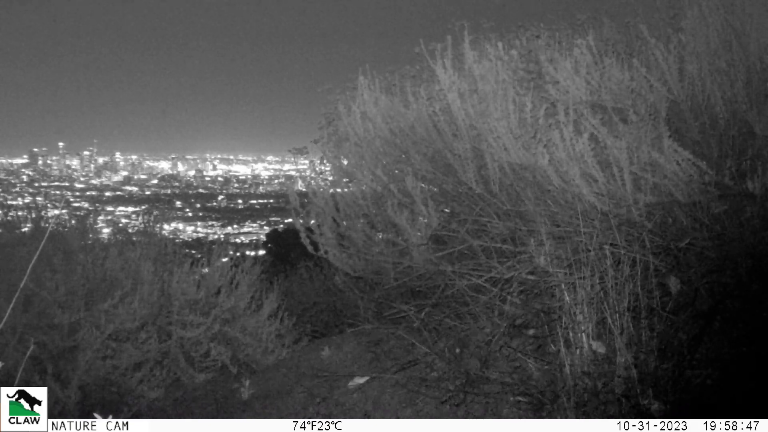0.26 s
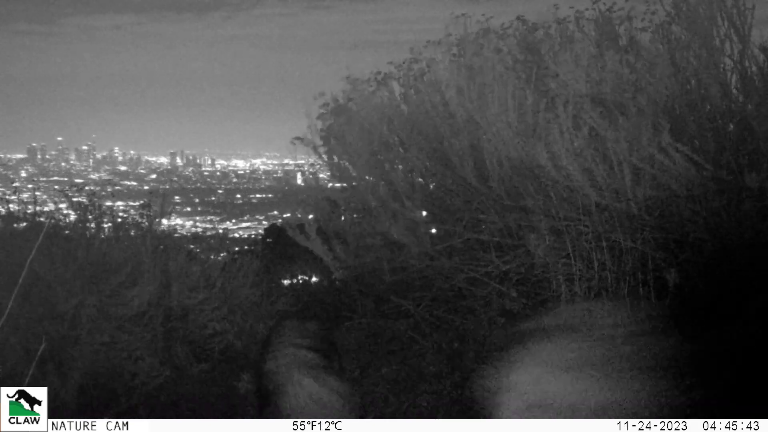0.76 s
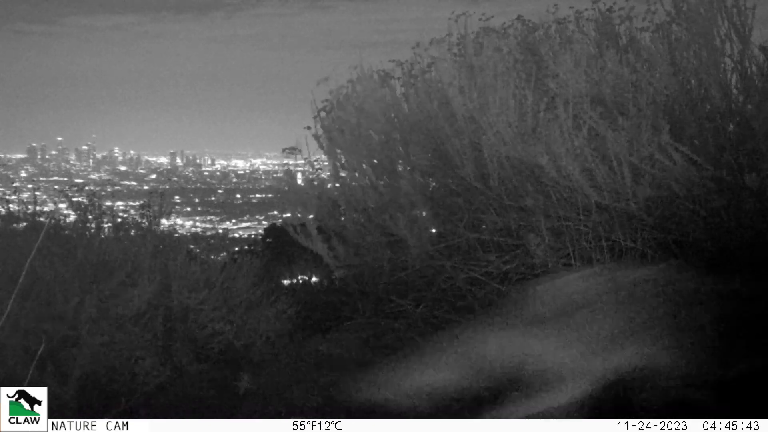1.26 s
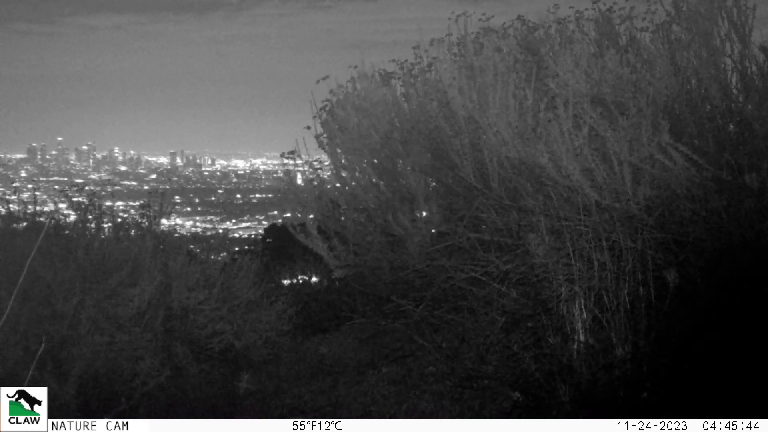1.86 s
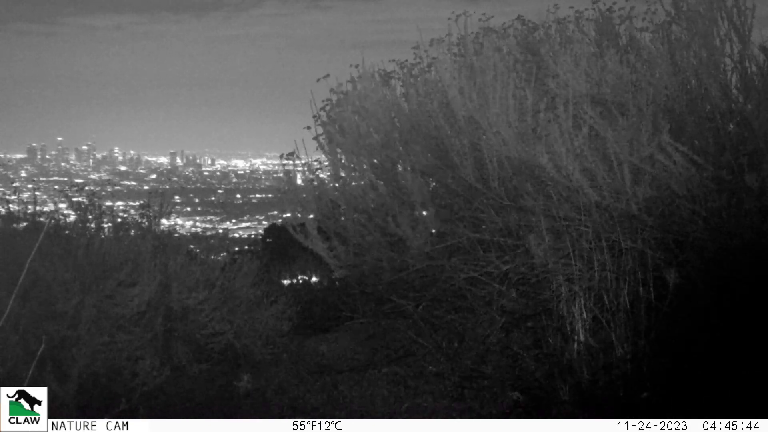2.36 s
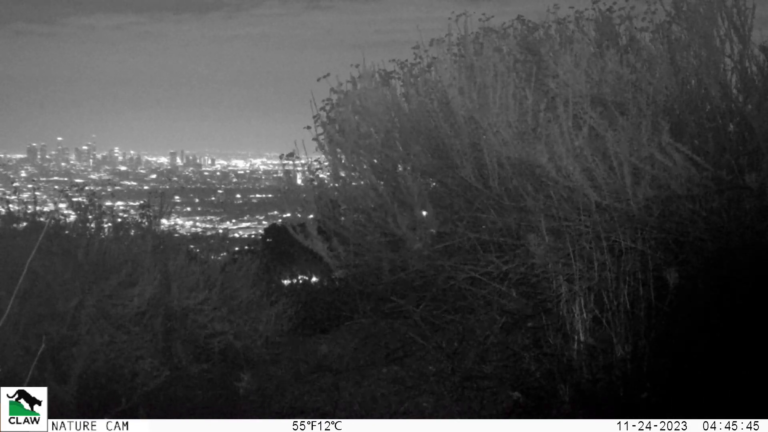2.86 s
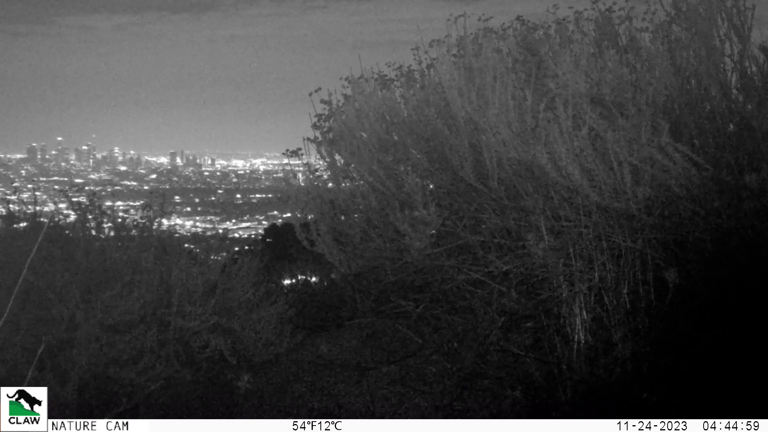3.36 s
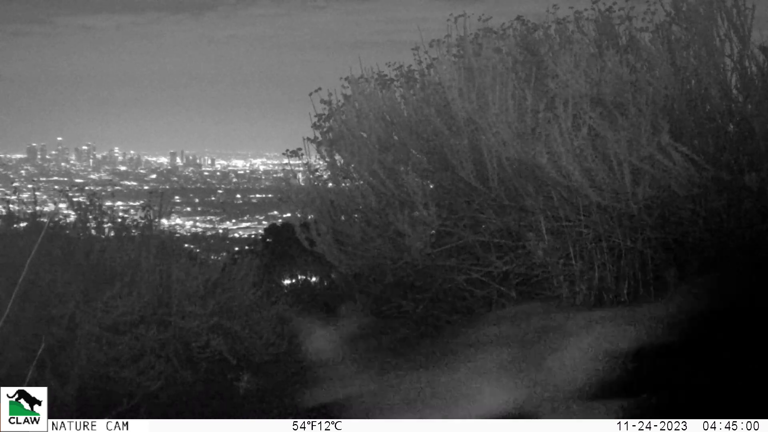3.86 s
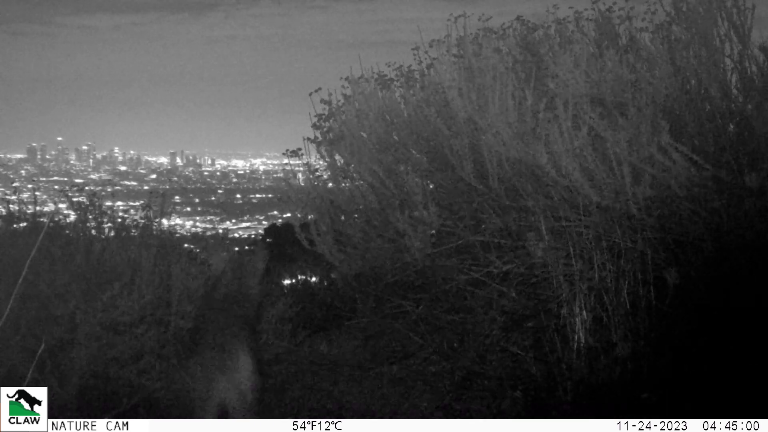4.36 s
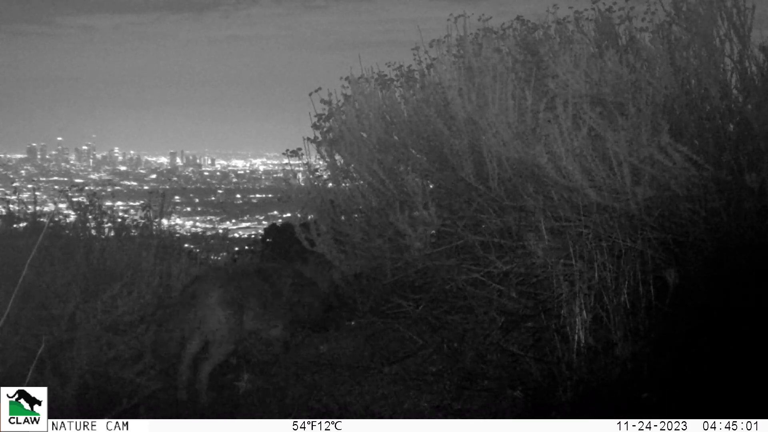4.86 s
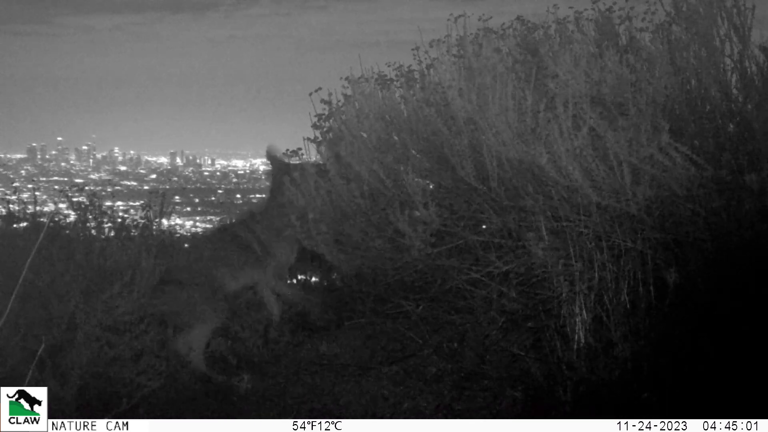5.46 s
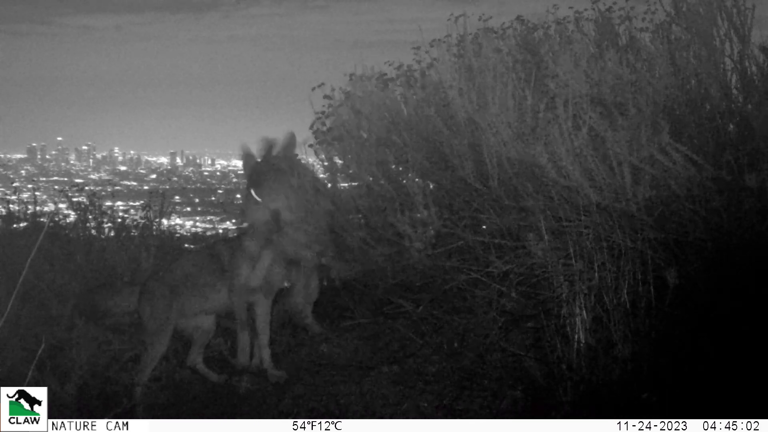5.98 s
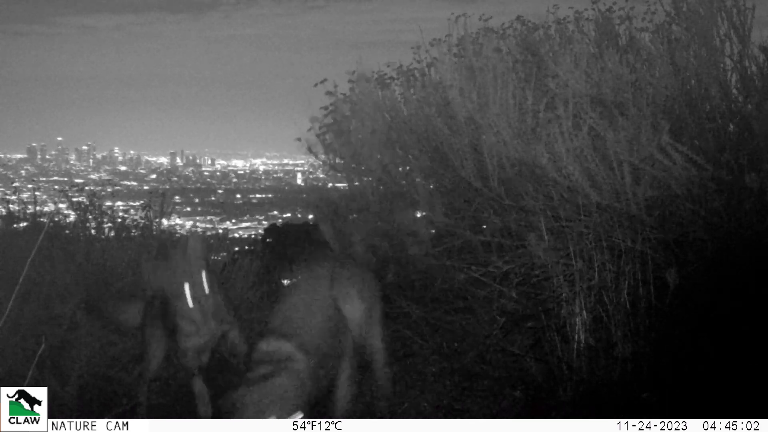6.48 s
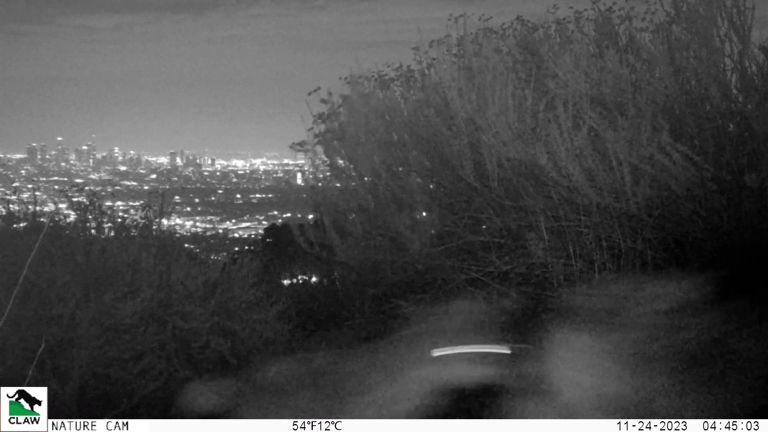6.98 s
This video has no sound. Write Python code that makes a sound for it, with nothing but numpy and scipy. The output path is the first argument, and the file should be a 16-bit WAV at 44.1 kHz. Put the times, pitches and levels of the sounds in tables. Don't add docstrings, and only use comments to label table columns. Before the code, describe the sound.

Dry stems crackle and snap as coyote-like animals scuffle past, followed by a quiet night lull with cricket chirps, buzzing katydid strokes and lighter rustling.

```python
import sys
import numpy as np
from scipy import signal
from scipy.io import wavfile
from scipy.ndimage import uniform_filter1d

SR = 44100
rng = np.random.default_rng(int(sys.argv[2]) if len(sys.argv) > 2 else 0)


def unload_audio(sound):
    columns = np.transpose(np.atleast_2d(sound))
    steps = np.round(np.clip(columns, -1, 1) * 32767)
    wavfile.write(sys.argv[1], SR, steps.astype(np.int16))


def field_ratio(decibels):
    return 10 ** (np.asarray(decibels, dtype=float) / 20)


N = 318843


def evened(x):
    return x / np.sqrt(np.mean(x ** 2) + 1e-20)


def read(points, hz):
    f, value = np.transpose(points)
    return np.interp(np.log(hz + 1), np.log(f + 1), value)


def column(rows, k):
    return np.interp(np.arange(N) / SR, *np.transpose(rows)[[0, k]])


def add(mix, s, sound):
    part = mix[round(s * SR):][:len(sound)]
    part += sound[:len(part)]


def colour(x, points):
    level_db = np.maximum(read(points, np.fft.rfftfreq(4096, 1 / SR)), -100)
    half = level_db * np.log(10) / 20
    full = np.r_[half, half[-2:0:-1]]
    taps = np.fft.ifft(np.exp(full - 1j * signal.hilbert(full).imag)).real[:2048]
    return signal.oaconvolve(x, taps)[:len(x)]


def resonate(x, hz, width):
    turn = np.exp(2j * np.pi * np.cumsum(hz * np.ones(len(x))) / SR)
    r = np.exp(-np.pi * width / SR)
    return 2 * (turn * signal.lfilter([1 - r], [1, -r], x / turn + 1e-18)).real


def band(x, lo_hz, hi_hz):
    return signal.sosfilt(signal.butter(3, [lo_hz, hi_hz], "bandpass", fs=SR, output="sos"), x)


def rustle():
    # pitch in Hz, level in dB per Hz.
    stem_colour = [(350, -64), (600, -13.5), (929, -20.5), (1360, -18), (1840, -15.5), (2290, -12.5),
                   (3450, -15), (4530, -8), (4980, -10.5), (5410, -2), (6030, 2.5), (8040, -11.5),
                   (8970, -12.5), (15700, -20.5)]
    # time in seconds, pitch in Hz.
    twig_hz = [(1.9, 8970), (2., 10100), (2.45, 10100), (2.6, 8860)]
    db = stir_db()
    thick, thin = cracks(), cracks()
    body = band(colour(thick, stem_colour), 260, 8170)
    top = band(colour(.5 * thick + thin, stem_colour), 9100, 17600)
    top = .8 * top + 1.2 * resonate(top, column(twig_hz, 1), 1100)
    top_db = -55 - 7 + 0.85 * (db + 54.5)
    return field_ratio(db) * evened(body) + field_ratio(top_db) * evened(top)


def stir_db():
    # time in seconds, level in dB.
    settling = [(.385, -80), (.4, -60.5), (.7, -58.5), (.97, -60), (1.27, -63), (1.94, -62), (1.975, -69),
                (2.4, -64.5), (2.59, -62.5), (2.64, -73), (2.8, -65), (3.1, -67), (3.2, -64.5),
                (3.45, -64.5), (3.55, -74), (5.43, -73), (5.47, -62.5), (7.23, -66)]
    # peak time in seconds, peak level in dB, rise in seconds, fall in seconds.
    sweeps = [(.484, -47.5, 0.033, 0.13), (.598, -49.5, .1, 0.084), (.748, -53, .15, 0.073),
              (.87, -45.5, 0.023, 0.063), (1.012, -49.5, 0.032, 0.33), (1.15, -58, .1, 0.14),
              (1.3, -52.5, 0.034, 0.043), (1.59, -47.5, 0.017, 0.038), (1.71, -52.5, .07, 0.061),
              (1.995, -56, 0.017, .4), (2.09, -58, 0.13, .07), (2.19, -52.5, 0.06, 0.17),
              (2.24, -56, .1, 0.036), (2.35, -51.5, .09, .1), (2.68, -59.5, .015, .2),
              (3.728, -52, 0.041, .045), (3.954, -54, 0.029, 0.11), (4.02, -57, .15, 0.017),
              (4.158, -69, .12, .04), (5.68, -61, 0.42, .05), (5.714, -49.5, 0.044, .14),
              (5.816, -58, .03, 0.064), (5.95, -53, 0.072, 0.054), (5.99, -56.5, .05, .9),
              (6.522, -56.5, 0.11, 0.32), (6.898, -58.5, 0.32, .25), (7.108, -50.5, 0.019, 0.022),
              (7.218, -60, 0.14, .03)]
    span_db = 12
    t = np.arange(N) / SR
    power = field_ratio(2 * column(settling, 1))
    for s, db, rise, fall in sweeps:
        away = np.maximum((s - t) / rise, (t - s) / fall)
        power = power + field_ratio(2 * (db - span_db * away))
    return 10 * np.log10(power)


def cracks():
    size = field_ratio(3.35 * np.minimum(rng.exponential(1, N), 5.5))
    happens = rng.random(N) < 3000 / SR
    clump = field_ratio(1.6 * evened(uniform_filter1d(rng.standard_normal(N), 350)))
    clicks = size * happens * rng.choice([-1., 1.], N) * clump
    linger = np.exp(-1 / (0.0032 * SR))
    hiss_power = signal.lfilter([1 - linger], [1, -linger], clicks ** 2)
    return evened(clicks + 1.46 * rng.standard_normal(N) * np.sqrt(hiss_power))


def snap(s, db, top_db, mid_db):
    t = np.arange(3000) / SR
    bottom_db = mid_db - 7
    t60 = 0.038 - .0009 * mid_db
    a, b = rng.standard_normal((len(t), 2)).T
    crack = (t == 0) * 3.5 + 1.44 * a * field_ratio(-60 * t / 0.0046)
    uneven = field_ratio(3.8 * evened(uniform_filter1d(b, 25)))
    splinters = a * field_ratio(-60 * t / np.clip(t60, .008, .12)) * uneven

    case = band(resonate(crack + 0.55 * splinters, 6290, 760), 4520, 8300)
    top = band(crack + 0.43 * splinters, 7900, 13600)
    thin_wood = .12 * top + resonate(resonate(top, 9200, 3900), 9200, 3900)
    thick_wood = band(crack + 0.12 * splinters, 2920, 5230)
    bottom = band(crack, 1160, 3420)
    parts = [(0, case), (top_db + 6.5, thin_wood), (mid_db + 7.5, thick_wood), (bottom_db + 3.0, bottom)]
    return s, sum(field_ratio(db + rel_db) * part / abs(part).max() for rel_db, part in parts)


def thump(s, db, hz):
    t = np.arange(1200) / SR
    top_hz = 1.22 * max(hz, 800)
    push = rng.standard_normal(len(t)) * field_ratio(-60 * t / 0.015)
    push = band(band(push, 130, top_hz), 150, top_hz)
    return s, field_ratio(db) * push / abs(push).max()


def katydid_stroke(start, length, full_s, peak_db, first_hz):
    # pitch in Hz, width in Hz, level in dB.
    wing_modes = [(9550, 350, -6), (10450, 350, -3), (11250, 220, 2), (12000, 260, 0), (12550, 300, 0),
                  (13050, 300, 0), (13750, 350, 0)]
    t = np.arange(0, length, 1 / SR)
    bite_s, lift_s = 0.028, 0.026
    db = peak_db - 5.5 * np.maximum(1 - t / full_s, 0)
    db = db - 72 * np.maximum(t - full_s, 0)
    db = db - 6.5 * np.maximum(1 - t / bite_s, 0) - 11 * np.maximum(1 - (length - t) / lift_s, 0)
    hz = np.minimum(first_hz + 9700 * np.maximum(t - bite_s, 0), 12900)
    low_db = -10 - 12 * (t / length) ** 2.8
    top_db = -10 + 1.1 * (db - peak_db)

    a, b, c = rng.standard_normal((len(t), 3)).T
    rate = np.interp(t, [0, .06, .12], [100, 150, 345])
    turns = np.cumsum(rate * (1 + 0.065 * evened(uniform_filter1d(a, 300)))) / SR % 1
    puffs = .33 + np.exp(-turns / .45)
    scrape = np.tanh(b / 1.9) * puffs * field_ratio(0.57 * evened(uniform_filter1d(c, 60)))
    other_scrape = np.tanh(a / 1.9) * puffs

    size = .95 if start < 1 else 1
    modes = 0
    for f, width, mode_db in wing_modes:
        gain = field_ratio(mode_db - 5.6 * ((f * size - hz) / 1000) ** 2)
        modes = modes + gain * resonate(scrape, f * size, width) / np.sqrt(width)
    wide = resonate(resonate(scrape, hz, 1900), hz, 1900)
    mirror = 1.2 * evened(band(modes, 7900, 15300)) + 0.95 * evened(wide)
    mirror = evened(mirror + 0.22 * evened(band(scrape, 9000, 16500)))

    cell_level = db + low_db
    cell_hz = np.minimum(6494 + 110 * (cell_level.max() - cell_level), 8500)
    cell = scrape
    for _ in range(3):
        cell = resonate(cell, cell_hz, 1500)
    low = evened(evened(cell) + 0.97 * evened(band(other_scrape, 7600, 9100)))
    wing = mirror + field_ratio(low_db) * low + field_ratio(top_db) * evened(band(other_scrape, 14050, 16200))
    echoes = np.zeros(420)
    echoes[[0, 66, 275, 361]] = .8, .3, .45, -.3
    return start, np.convolve(field_ratio(db) * wing * signal.windows.tukey(len(t), .02), echoes)


def cricket_chirp(start, end, first_hz, hz, db, rate, sag):
    t = np.arange(0, end - start, 1 / SR)
    beat = t * rate % 1
    held = np.interp(t, [0, 0.59 * (end - start)], [first_hz, hz])
    uneven = field_ratio(1.6 * rng.standard_normal(40))[(t * rate).astype(int)]
    pitch = held - 1.5 * sag * (beat ** 2.6 - .16)
    pulses = (.04 + np.sin(np.pi * beat) ** 2) * uneven
    tone = np.sin(2 * np.pi * np.cumsum(pitch) / SR) * pulses
    blurred = tone + 0.19 * np.roll(tone, 310) - 0.31 * np.roll(tone, 720)
    ends = np.minimum(t / 0.0025 + .1, (t[-1] - t) / (0.13 * t[-1]))
    return start, field_ratio(db + 4.5) * blurred * np.clip(ends, 0, 1)


def far_car():
    # time in seconds, level in dB.
    passing = [
        (4.4, -95),
        (4.9, -75),
        (5.6, -71),
        (6.1, -80),
        (6.5, -95),
    ]
    roar = resonate(resonate(rng.standard_normal(N), 910, 450), 910, 450)
    return field_ratio(column(passing, 1)) * evened(roar)


def night():
    # pitch in Hz, level in dB per Hz.
    air_colours = [
        [(250, -16), (700, -16), (1500, -24), (3000, -17.5), (5000, -24), (15700, -26.5)],
        [(180, -42), (300, -17), (554, -2), (1020, -4), (1110, -5), (1760, -6), (15700, -8.5)],
        [(180, -24), (300, -11), (643, -2.5), (1950, -5.5), (3050, -6.5), (3480, -6.5), (3970, -6.5),
         (6110, -7.5), (7210, -9), (15700, -8)],
    ]
    air_levels = [-62.5, -62.5, -59]
    # pitch in Hz, level in dB per Hz.
    rumble_colours = [
        [(8.8, -36), (15, 2.5), (86, 0), (152, -9.5), (214, -23), (270, -16.5), (362, -32.5), (500, -41),
         (650, -63), (1100, -120)],
        [(8.8, -33), (15, -2), (72, 0), (500, -19), (650, -41.5), (1100, -120)],
    ]
    # time in seconds, level in dB.
    gusts = [(0, -43.5), (.15, -46.5), (.19, -40), (.24, -46), (.43, -46.5), (.5, -59), (.76, -57),
             (1.4, -61), (3.15, -63), (3.35, -58.5), (4.6, -60), (5.2, -58.5), (7.23, -59)]
    shares = view_shares()
    air = 0
    for share, db, points in zip(shares, air_levels, air_colours):
        air = air + share * field_ratio(db) * evened(colour(rng.standard_normal(N), points))
    wind, traffic = (evened(colour(rng.standard_normal(N), points)) for points in rumble_colours)
    rumble = shares[0] * wind + np.sqrt(1 - shares[0] ** 2) * traffic
    return air + field_ratio(column(gusts, 1)) * rumble


def view_shares():
    # start in seconds, end in seconds.
    changes = [
        (.39, 0.6),
        (3.15, 3.25),
    ]
    a, b = (np.clip((np.arange(N) / SR - s) / (e - s), 0, 1) for s, e in changes)
    return np.sqrt([1 - a, a - b, b])


def scene():
    # time in seconds, peak in dB,
    # then thin splinters and thick wood, both in dB against the peak.
    snaps = [(0.4778, -35.5, -10, -23), (0.501, -42, -32, -15), (0.591, -37, -23, -20),
             (0.886, -42, -2.5, -6), (1.062, -42, -19, -7), (1.298, -34, -20, -15), (1.3482, -41, -14, -10),
             (1.3635, -23, -30, -20), (1.3724, -42, 2, -16), (1.4065, -31, -9, -20),
             (1.4162, -24.5, -13.5, -17), (1.434, -39, -1, -19), (1.4849, -37, -10, -17),
             (1.5314, -34, -17, -5), (1.536, -26, -20, -19), (1.6024, -34, -15, -13),
             (1.6374, -28, -19, -14), (1.646, -36, -18, -13), (1.657, -43, -6, -5), (1.682, -21, -21, -6),
             (1.8335, -34.5, -18.5, -18), (1.9124, -34.5, -26, -22), (2.1291, -36.5, -11, -4.5),
             (2.2137, -34.5, -6.5, -28), (2.2174, -34, -22, -19), (2.278, -39, -25, -11.5),
             (2.7426, -22.5, -11, -24), (3.0963, -44, -6, -15), (5.9498, -34.5, -18, -24),
             (6.0152, -35.5, -18, -15)]
    # time in seconds, peak in dB.
    small_twigs = [(0.449, -52), (0.635, -46), (0.8066, -46), (0.8664, -43), (1.2853, -42), (1.4688, -41),
                   (1.5007, -45), (1.5137, -47), (1.5648, -40), (1.5823, -39), (1.7464, -45),
                   (1.7706, -38.5), (1.7988, -40), (1.8644, -51), (1.982, -46), (2.1665, -43),
                   (2.3074, -46), (2.6753, -47), (2.823, -54), (5.7079, -39), (5.7354, -39), (5.789, -39),
                   (5.818, -37.5), (6.376, -41.5), (6.5034, -40.5), (6.5151, -40), (7.1055, -41)]
    # time in seconds, peak in dB, pitch in Hz.
    paws = [
        (0.749, -50, 318),
        (0.867, -52, 388),
        (1.096, -45, 1290),
        (6.639, -51.5, 350),
    ]
    # start in seconds, length in seconds,
    # time to full strength in seconds, peak in dB, first wing pitch in Hz.
    strokes = [
        (0.027, 0.1, 0.022, -46.5, 10300),
        (4.201, .15, 0.1, -48.5, 10900),
        (4.373, 0.2, 0.097, -41.5, 10900),
        (4.564, 0.23, 0.1, -40, 11150),
        (4.791, .23, 0.098, -39.5, 11400),
        (5.02, 0.25, 0.076, -39, 11300),
        (5.255, 0.17, 0.068, -40.5, 11300),
    ]
    # pitch in Hz, level in dB, pulses per second,
    # fall in pitch within a pulse in Hz.
    chorus = [(2610, -68, 27, 449), (2430, -70.5, 24, 206), (3100, -65.5, 34, 140), (2780, -71, 28, 302),
              (3230, -69, 30, 247), (2950, -71, 46, 180)]
    # first pitch in Hz, held pitch in Hz, pulses per second,
    # fall in pitch within a pulse in Hz.
    voices = [(4010, 4160, 44, 150), (3290, 3340, 38, 120), (3235, 3240, 37, 119), (3380, 3535, 37, 127),
              (3190, 3330, 51, 230)]
    # start in seconds, length in seconds, level in dB.
    chirps = [
        [(0.186, .2, -71)],
        [(2.304, 0.26, -72)],
        [(3.175, 0.16, -69.5), (4.303, 0.25, -68.5), (5.358, 0.2, -68.5), (6.29, .24, -68)],
        [(3.663, .195, -66.5), (4.65, 0.18, -67.5), (5.478, .17, -67.5), (6.401, 0.16, -67.5)],
        [(6.892, 0.26, -69)],
    ]

    mix = night() + far_car() + rustle()
    for row in snaps:
        add(mix, *snap(*row))
    for s, db in small_twigs:
        add(mix, *snap(s, db, -10, -19))
    for row in paws:
        add(mix, *thump(*row))
    for row in strokes:
        add(mix, *katydid_stroke(*row))
    for hz, db, rate, sag in chorus:
        add(mix, *cricket_chirp(0, 0.45, hz, hz, db, rate, sag))
    for (first_hz, hz, rate, sag), rows in zip(voices, chirps):
        for s, length, db in rows:
            add(mix, *cricket_chirp(s, s + length, first_hz, hz, db, rate, sag))
    return mix[None]


def top_cut(x):
    return signal.sosfilt(signal.butter(12, 16480, fs=SR, output="sos"), x)


def record(dry):
    low_pass = signal.firwin(511, 15800, window=("kaiser", 9), fs=SR)
    cut = signal.oaconvolve(dry, low_pass[None], "same")
    return top_cut(cut)


dry = scene()
out = record(dry)
unload_audio(out)
```